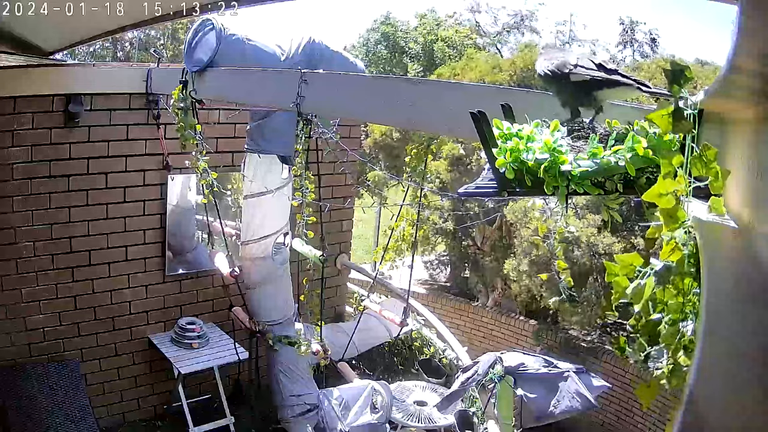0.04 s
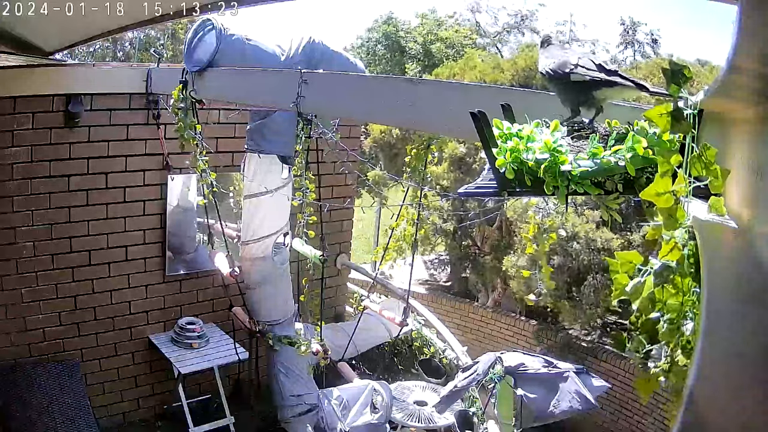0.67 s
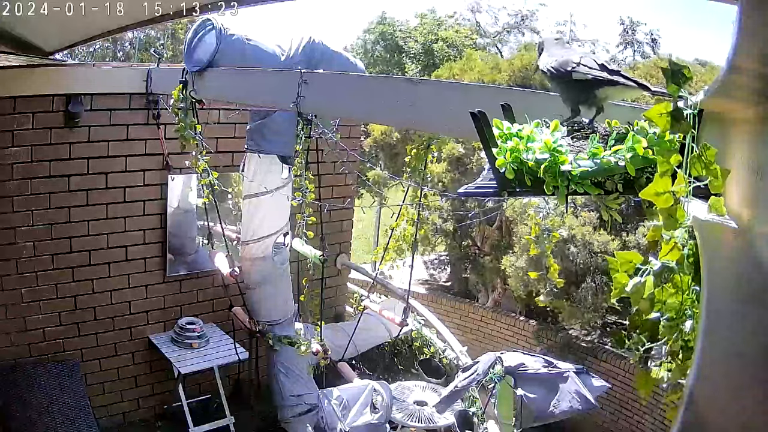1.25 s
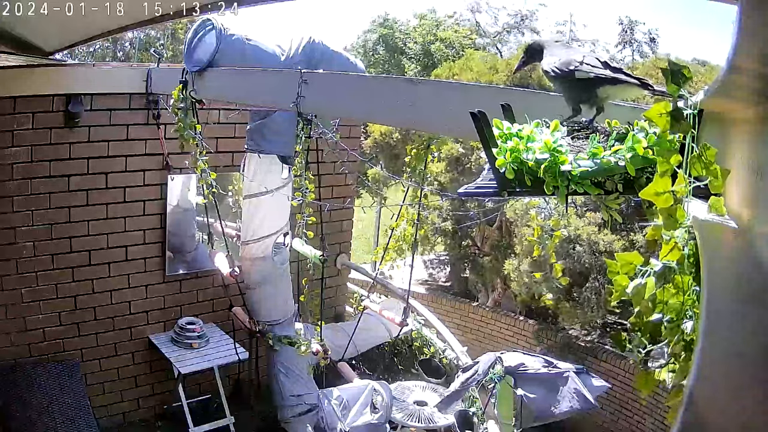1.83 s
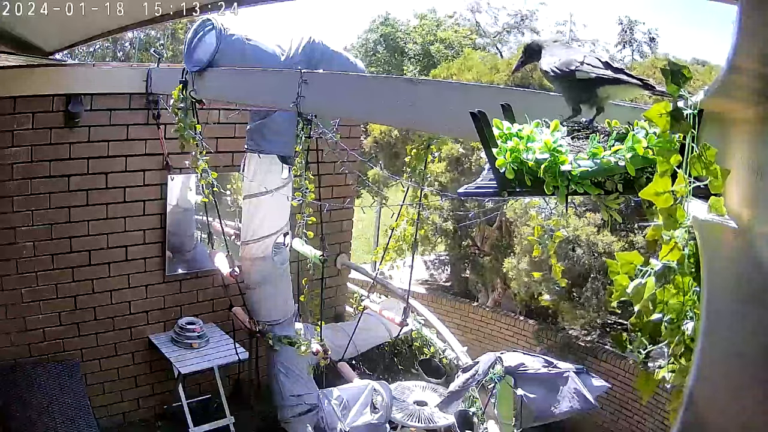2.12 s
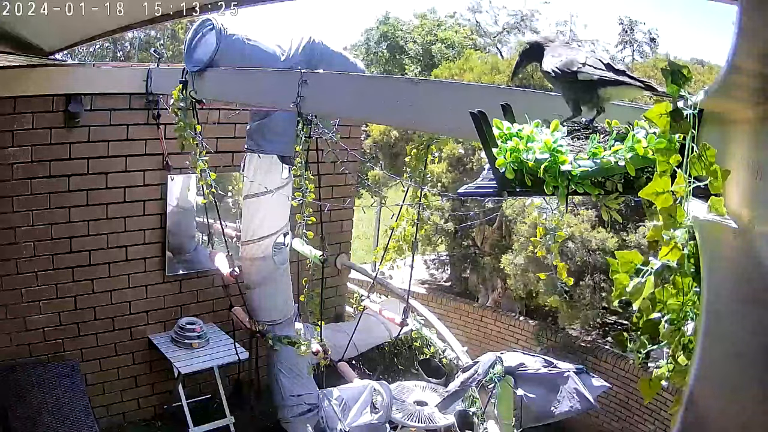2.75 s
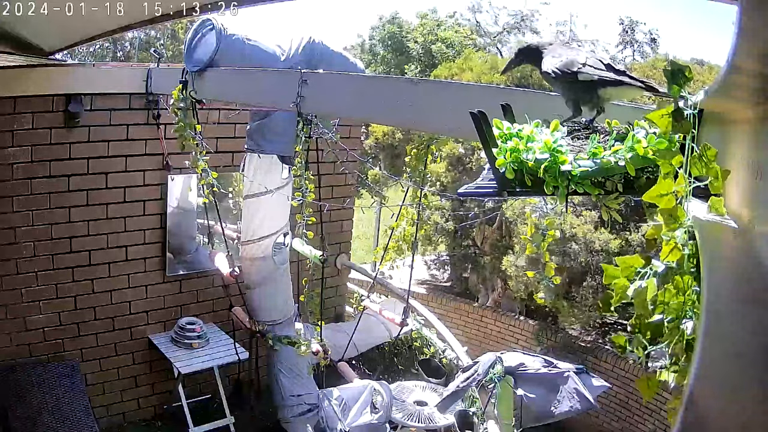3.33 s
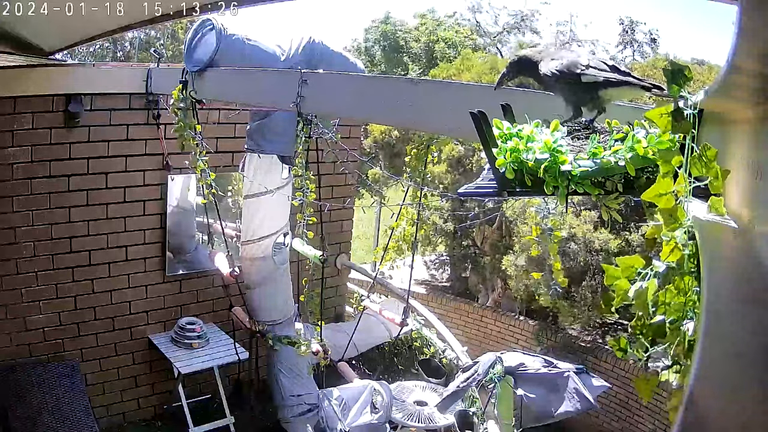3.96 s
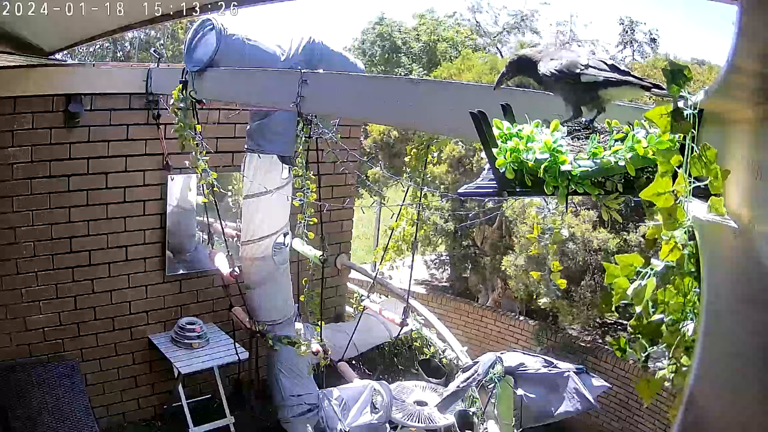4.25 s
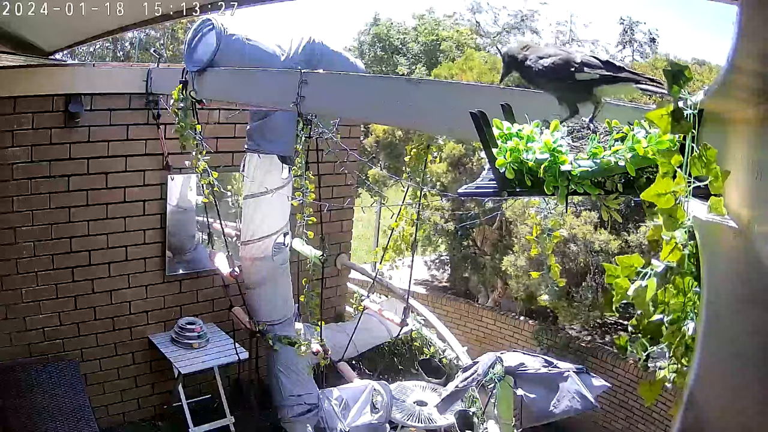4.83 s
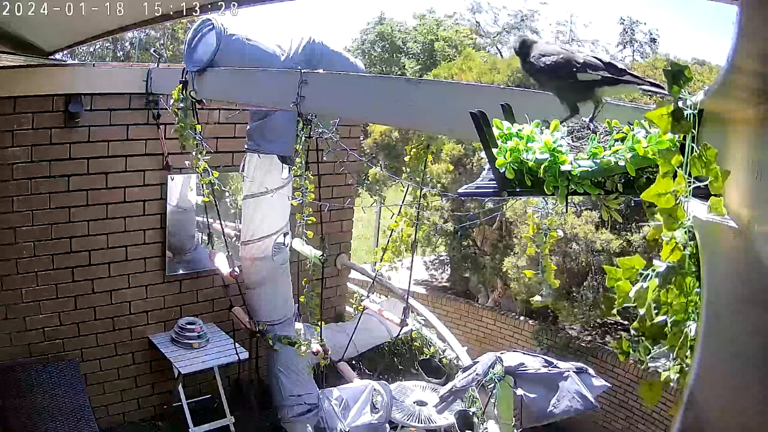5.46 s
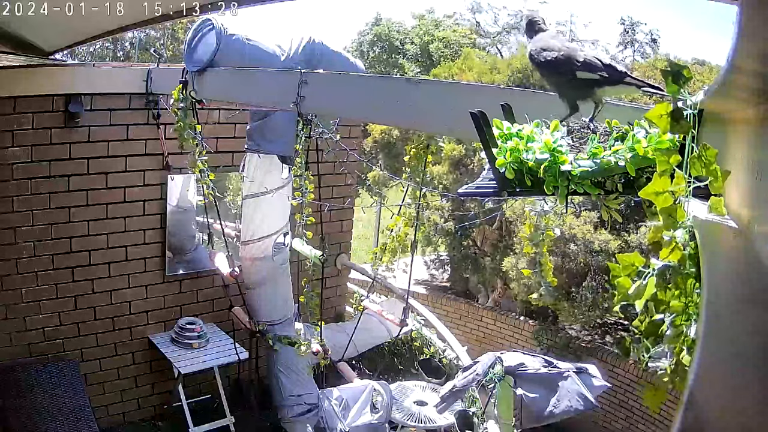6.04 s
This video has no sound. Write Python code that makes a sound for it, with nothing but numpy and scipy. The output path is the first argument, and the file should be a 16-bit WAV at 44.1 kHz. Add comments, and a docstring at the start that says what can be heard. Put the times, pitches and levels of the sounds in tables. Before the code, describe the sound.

Quiet outdoor air runs throughout on a balcony, with a faint, brief leaf rustle at the very start. At about 0.7 seconds, gusts hit the small microphone with loud, low thumps that last until 1.2, then flutter weakly until 2 seconds. At 1.1 a large bird nearby gives a short, clear squeal that arches in pitch. From 2.7 to 3.3 it makes a longer, swelling rasp that settles into a tone near its end. A shorter, quieter rasp comes at 5.2 with a small wind bump, as a soft breeze rises in the trees. More low gusts thump the microphone at around 5.6 to 5.8 seconds. Each call ends in a faint falling squeak and has a gritty, metallic treble, with only a very short reflection from the balcony wall and roof.

```python
"""Leaves rustle on a balcony, then gusts thump on a small camera's microphone as eddies pass its port.
A currawong calls, its syrinx membranes sounding through throat and beak: first a clear arched squeal,
then a long rasp that locks into a tone. A short rasp comes last, as wind rises in the trees and the
gusts return. Each harsh call ends in a faint falling squeak. Throughout, the camera holds each of
its slow samples, which mirrors the calls into a metallic treble."""
import sys
import numpy as np
from scipy import signal
from scipy.fft import rfft, irfft, next_fast_len
from scipy.io import wavfile
from scipy.ndimage import uniform_filter1d, map_coordinates

SR = 44100
rng = np.random.default_rng(int(sys.argv[2]) if len(sys.argv) > 2 else 0)


def materialize(psi):
    """Save the field psi as 16-bit PCM at rate SR to the path in sys.argv[1].

    A 1-D psi becomes a single channel; in a 2-D psi each row is a channel.
    """
    bounded = np.clip(np.atleast_2d(psi).T, -1, 1)
    quanta = np.round(bounded * 32767).astype(np.int16)
    wavfile.write(sys.argv[1], SR, quanta)


N = 268436
TIME = np.arange(N) / SR

# the calls: start_s, length_s, attack_s, final_db, crescendo_db_per_s, scoop_hz, pitch_hz,
# crest_hz, crest_after_s, crest_width_s, hiss_db
CALLS = [(1.102, .238, 0.027, -19, -4, 0, 928.4, 1041, .168, .115, 11),
         (2.706, .562, 0.015, -21, 12, 160, 804.4, 901.4, .527, .08, 14),
         (5.193, 0.25, 0.027, -25.5, 9.5, 230, 791.7, 809.8, .18, .07, 11)]
# membrane harmonics at full effort, from the fundamental up: level_db
HARMONICS_DB = [-3.5, 3, -5.5, -8.5, -17]
# resonances of throat and beak, one curve a call: frequency_hz, relative_db
THROATS = [
    [(400, -39.5), (750, -16.5), (1000, -10.5), (1150, -32), (1450, -4.5), (1800, -2.5), (2050, 3),
     (2250, -3), (2700, -10.5), (3100, -11.5), (4000, -41.5)],
    [(500, -29.5), (720, -16.5), (880, -11), (1100, -20), (1400, -1), (1680, -1.5), (1900, -2.5),
     (2400, -4), (2600, -9), (2800, -18), (3550, -12), (4000, -23.5)],
    [(500, -17), (700, -6.5), (880, -1), (1050, -7.5), (1280, -13.5), (1600, 2.5), (1850, 0), (2070, -8),
     (2400, 2), (2780, -15), (3080, -3), (3330, -17), (3600, -2), (4000, -13.5)],
]
# the rasp locks into a tone: start_s, end_s, clearness (0-1)
CLEAR_SPANS = [(1.073, 1.347, 0.92), (1.358, 1.422, 0.84), (3.018, 3.124, 0.46), (3.12, 3.278, 0.85)]
# the membranes lock into a slower beat: start_s, end_s, cycles_per_beat, depth (0-1), swing_rad
SUBHARMONICS = [(1.165, 1.272, 4, .36, .19), (3.115, 3.168, 2, .42, 0), (3.16, 3.275, 3, .42, .16)]
# squeaks as the beak closes: start_s, length_s, from_hz, to_hz, level_db
SQUEAKS = [(1.394, .042, 850, 730, -47), (3.318, .052, 920, 630, -43), (5.49, .032, 880, 680, -43.5)]
# gusts at the microphone port: arrival_s, hold_s, level_db, decay_db_per_s
GUSTS = [(0.0, 0.0098, -41, 116), (0.728, 0.019, -16.5, 280), (0.797, 0.022, -28, 212),
         (1.013, 0.012, -32, 196), (1.044, 0.036, -25.5, 201.5), (1.1, 0.069, -19.5, 430),
         (1.55, 0.036, -35, 247), (1.647, .14, -42.5, 348.5), (1.99, .035, -39, 449),
         (5.21, 0.012, -28.5, 600), (5.501, 0.011, -36, 398), (5.629, 0.052, -22.5, 510),
         (5.732, .035, -23, 520), (5.842, 0.034, -40, 65)]
# hard eddies that hit the port: centre_s, level_db, frequency_hz, relative_puff_db
EDDIES = [(0.7338, -4.5, 220, -6.5), (.752, -12.5, 98, -14), (0.813, -19, 140, -10),
          (1.078, -13, 133, -16.5), (1.104, -7.5, 115, -16), (1.136, -6.5, 108, -16), (1.145, -16, 404, -2),
          (1.166, -13.5, 217, -6.5), (5.204, -25.5, 91, -20), (5.643, -16, 179, -23),
          (5.724, -16.5, 172, -17)]
# noise spectra of gust rumble, gust flutter, outdoor air and trees: frequency_hz, relative_density_db
RUMBLE_SPECTRUM = [(15, -27.5), (28, 7), (50, 1), (85, 4), (130, 0), (200, -9), (260, -11), (340, -27),
                   (550, -28.5), (900, -41), (1500, -100)]
FLUTTER_SPECTRUM = [(100, -8), (250, 12), (420, -1.5), (650, -13.5), (1000, -30), (2000, -41.5),
                    (4000, -24.5)]
AIR_SPECTRUM = [(15, -21), (30, -1), (85, -5.5), (120, -9), (250, -10), (400, -12.5), (750, -22),
                (1500, -25.5), (2200, -29), (3200, -28.5), (3700, -32.5), (4200, -42), (6000, -94.5)]
TREE_SPECTRUM = [(150, -23), (300, -12), (520, -3), (790, -5), (1050, -13.5), (1400, -18.5), (3800, -51)]
# faint far tones: start_s, length_s, pitch_hz, level_db
FAR_TONES = [(2.02, 0.496, 103.2, -55.5), (6.068, 0.011, 774, -43)]
# leaves in the planter: start_s, length_s, level_db
RUSTLES = [(0.0, 0.05, -47.5), (0.037, 0.058, -45)]
# reverberation time of the balcony: frequency_hz, t60_s
BALCONY_DECAY = [(200, .25), (1500, 0.15), (4000, 0.13)]

ONSET_DB, RELEASE_DB_PER_S = 48, 492  # a call climbs out of this depth and dies at this rate
SCOOP_S, SAG_S, SAG_SHARE = .025, .03, .41  # pitch slides up, then sinks when the pressure ends
RASP, RASP_BUILD_S, RASP_FADE_S = .95, 0.034, .06  # roughness (0-1) of the free membranes
LOCK_S, CLEAR_HISS_DB = 0.0043, -12.5  # time to lock or break loose; a clear tone wastes less air
HISS_PEAK_SHARE, HISS_ARCH_DB = 0.35, 17  # the hiss thins to either side of this point in a call
PUSH_POWER = 1.1  # how fast the upper harmonics grow with effort
GUST_RISE_DB_PER_S, EDDY_HALF_S = 598, 0.0045
AIR_DB, CALM_DB, BREEZE_DB = -55, -63, -50
BREEZE_S, BREEZE_RISE_S = 5.13, 0.42
HOLD_HZ, TOP_HZ = 8000, 11050


def currawong():
    """Source and filter: the syrinx excites throat and beak resonances that differ for each call."""
    efforts = [effort(*call[:5]) for call in CALLS]
    source, voice = syrinx(efforts), np.zeros(N)
    for gain, throat in zip(efforts, THROATS):
        resonant = filtered(source, lambda hz: amp(along(throat, hz)))
        voice += gain * steady(resonant, size=700)
    return voice


def syrinx(efforts):
    """Membrane oscillation: irregular motion smears harmonics into bands; air hisses once a cycle."""
    pitch, rough, hiss_db = gesture()
    phase = 2 * np.pi * np.cumsum(pitch * (1 + 0.0367 * rough * wobble(1100))) / SR
    # a slow beat in strength and timing puts side tones around each harmonic
    strength, swing = np.ones(N), np.zeros(N)
    for start, end, cycles, depth, swing_rad in SUBHARMONICS:
        hold, beat = np.sqrt(arch(start, end - start)), phase / cycles
        strength *= 1 - depth * hold * np.cos(beat)
        swing += swing_rad * hold * np.sin(beat)
    push = sum(gain / gain.max() for gain in efforts) ** PUSH_POWER
    source = amp(hiss_db) * (1 + np.cos(phase)) * rng.standard_normal(N)
    for k, db in enumerate(HARMONICS_DB, 1):
        scatter = (wobble(400) + 1j * wobble(400)) / np.sqrt(2)
        modulation = np.sqrt(1 - rough ** 2) + rough * scatter
        partial = np.real(modulation * np.exp(1j * k * (phase + swing)))
        source += amp(db) * push ** max(k - 2, 0) * partial
    return strength * source


def gesture():
    """Frequency modulation and locking: pitch arches and sags; the membranes rasp unless they lock."""
    pitch, rasp, hiss_db = np.zeros((3, N))
    for start, length, _, _, _, scoop_hz, base_hz, crest_hz, crest_s, width, air_db in CALLS:
        age, after = np.maximum(TIME - start, 0), np.maximum(TIME - start - length, 0)
        pushed = age - after
        now = TIME > start - 0.5
        scoop = scoop_hz * np.exp(-age / SCOOP_S)
        crest = (crest_hz - base_hz) * np.exp(-((pushed - crest_s) / width) ** 2)
        sag = 1 + SAG_SHARE * np.expm1(-after / SAG_S)
        pitch[now] = ((base_hz - scoop + crest) * sag)[now]
        build = 1 - np.exp(-(age / RASP_BUILD_S) ** 2)
        rasp[now] = (RASP * build * np.exp(-(after / RASP_FADE_S) ** 2))[now]
        hiss_db[now] = (air_db - HISS_ARCH_DB * (pushed / length - HISS_PEAK_SHARE) ** 2)[now]
    locked = sum(clear * (step(start, LOCK_S) - step(end, LOCK_S)) for start, end, clear in CLEAR_SPANS)
    rough = np.clip(rasp * (1 - locked), 0, 1)
    return pitch, rough, hiss_db + CLEAR_HISS_DB * (1 - rough / RASP)


def effort(start, length, attack, final_db, crescendo):
    """Amplitude envelope of a call: a quick attack, a slow swell or fade, an exponential release."""
    age = TIME - start
    onset_db = ONSET_DB * np.exp(np.minimum(-age / attack, 2))
    swell_db = crescendo * np.clip(length - age, 0, length)
    release_db = RELEASE_DB_PER_S * np.maximum(age - length, 0)
    return amp(final_db - onset_db - swell_db - release_db)


def squeaks():
    """Pitch falls with tension: the slackening membrane glides down, strongest in its second harmonic."""
    out = np.zeros(N)
    for start, length, from_hz, to_hz, db in SQUEAKS:
        pitch = np.interp(TIME, [start, start + length], [from_hz, to_hz]) * (1 + 0.0191 * wobble(800))
        phase = 2 * np.pi * np.cumsum(pitch) / SR
        tone = .15 * np.sin(phase) + 1.4 * np.sin(2 * phase) + .2 * np.sin(3 * phase)
        out += amp(db) * arch(start, length) ** 2 * tone
    return out


def balcony(x):
    """Reverberation: reflections from the brick wall and roof form a short, exponentially dying tail."""
    hz, t, spectrum = signal.stft(rng.standard_normal(SR // 2), SR, nperseg=256)
    decay = amp(-60 * t / along(BALCONY_DECAY, hz)[:, None])
    tail = signal.istft(spectrum * decay, SR, nperseg=256)[1]
    response = np.pad(tail / np.linalg.norm(tail), (220, 0))  # arrives 5 ms late
    return signal.fftconvolve(x, response)[:N]


def gusts():
    """Turbulent pressure at the microphone port: flutter grows faster with force than rumble does."""
    force = sum(gust(*row) for row in GUSTS)
    rumble = amp(-2.0) * force * steady(noise(RUMBLE_SPECTRUM), size=900)
    flutter = amp(-4.5) * force ** 1.537 * steady(noise(FLUTTER_SPECTRUM), size=600)
    puff = steady(noise(FLUTTER_SPECTRUM), size=400)
    out = rumble + flutter
    # a hard eddy sweeps the small ones aside: a push and pull of pressure with a short puff
    for centre, db, hz, puff_db in EDDIES:
        age = TIME - centre
        passing = np.exp(-(age / EDDY_HALF_S) ** 2)
        thump = np.sin(2 * np.pi * hz * age) + amp(puff_db) * puff
        out = out * (1 - passing) + amp(db) * passing * thump
    return out


def gust(arrival, hold, db, decay):
    """Amplitude envelope of a gust: exponential growth, a plateau, exponential decay."""
    before, after = np.maximum(arrival - TIME, 0), np.maximum(TIME - arrival - hold, 0)
    return amp(db - GUST_RISE_DB_PER_S * before - decay * after)


def garden():
    """Ambient noise: steady air, wind rising in the trees, faint tones and a rustle in the planter."""
    air = amp(AIR_DB + 0.48 * wobble(6.3)) * noise(AIR_SPECTRUM)
    wind_db = CALM_DB + (BREEZE_DB - CALM_DB) * step(BREEZE_S, BREEZE_RISE_S)
    trees = amp(wind_db + wobble(3)) * noise(TREE_SPECTRUM)
    tones = sum(amp(db) * np.sqrt(2 * arch(start, length)) * np.sin(2 * np.pi * hz * TIME)
                for start, length, hz, db in FAR_TONES)
    stirring = sum(amp(db) * arch(start, length) for start, length, db in RUSTLES)
    rustle = stirring * noise([(800, -12), (2000, 1.5), (4000, -2.0)])
    return air + trees + tones + rustle


def amp(db):
    """Decibels to amplitude ratio."""
    return 10 ** (np.asarray(db) / 20)


def along(points, hz):
    """Interpolation of (frequency_hz, value) points on a logarithmic frequency axis."""
    frequencies, values = np.transpose(points)
    return np.interp(np.log(hz + 1), np.log(frequencies + 1), values)


def arch(start, length):
    """A half-sine window."""
    return np.abs(np.sin(np.pi * np.clip((TIME - start) / length, 0, 1)))


def step(centre, width):
    """A smooth rise from 0 to 1."""
    return (1 + np.tanh((TIME - centre) / width)) / 2


def wobble(rate):
    """A smooth random curve, rate knots a second."""
    return map_coordinates(rng.standard_normal(int(N * rate / SR) + 4), [TIME * rate])


def filtered(x, response):
    """Linear filtering: the spectrum of x times a frequency response."""
    size = next_fast_len(N + SR // 2)
    return irfft(rfft(x, size) * response(np.fft.rfftfreq(size, 1 / SR)), size)[:N]


def noise(spectrum):
    """Coloured noise of rms 1."""
    x = filtered(rng.standard_normal(N), lambda hz: amp(along(spectrum, hz)))
    return x / np.sqrt(np.mean(x ** 2) + 1e-20)


def steady(x, size):
    """Running normalisation to rms 1 over size samples."""
    return x / np.sqrt(np.abs(uniform_filter1d(x ** 2, size)) + 1e-12)


def scene():
    """Superposition: bird, reflections, gusts and garden add at one microphone, alike in both ears."""
    bird = currawong() + squeaks()
    mono = bird + amp(-13.5) * balcony(bird) + gusts() + garden()
    return np.array([mono, mono])


def record(dry):
    """Zero-order hold: each slow sample is a step, so the band is imaged either side of the hold rate."""
    narrow = filtered(dry.mean(axis=0), lambda hz: 1 / np.sqrt(1 + (2 * hz / HOLD_HZ) ** 60))
    mirrored = narrow * (1 + 2 * np.cos(2 * np.pi * HOLD_HZ * TIME))
    held = filtered(mirrored, lambda hz: np.sinc(hz / HOLD_HZ))
    # uneven sample timing adds grit wherever the wave is steep
    grit = amp(-12.5) * np.gradient(held) * rng.standard_normal(N)
    out = filtered(held + grit, lambda hz: 1 / np.sqrt(1 + (hz / TOP_HZ) ** 400))
    return np.array([out, out])


dry = scene()
out = record(dry)
materialize(out)
```